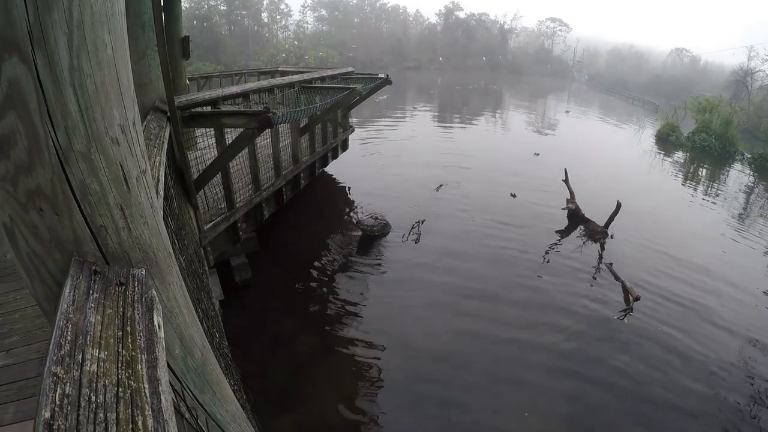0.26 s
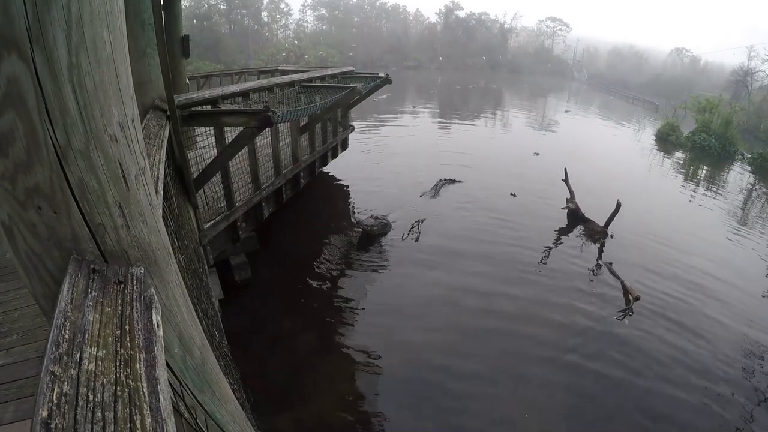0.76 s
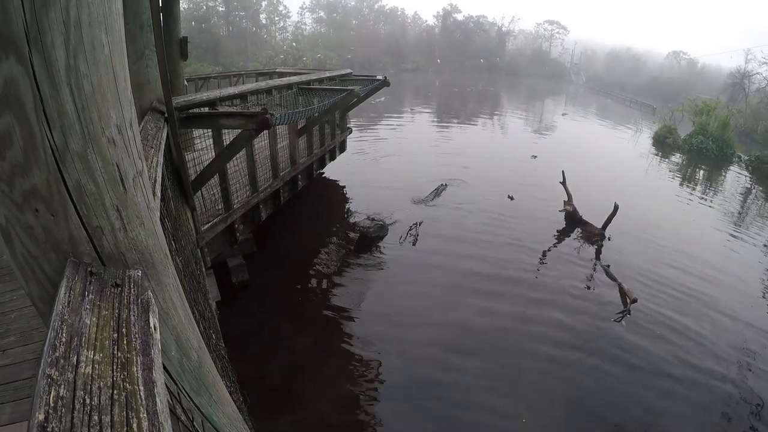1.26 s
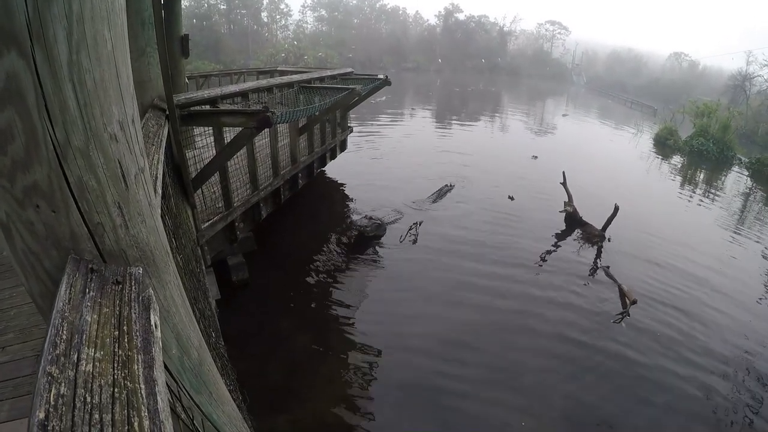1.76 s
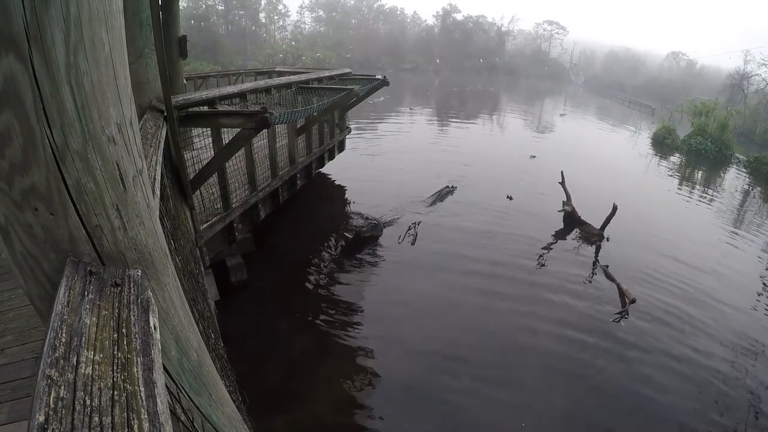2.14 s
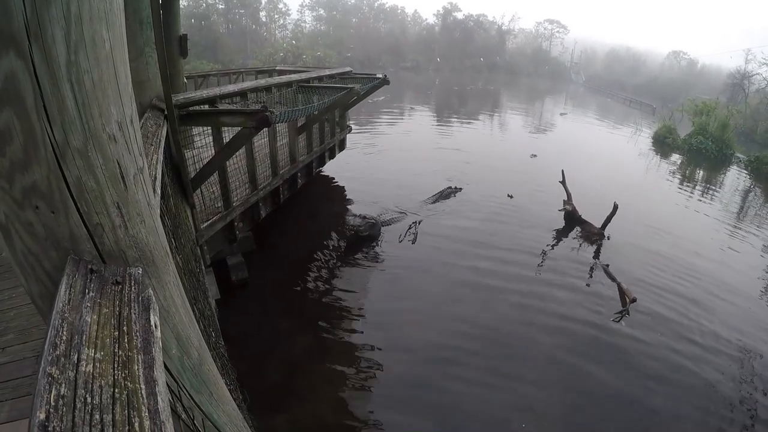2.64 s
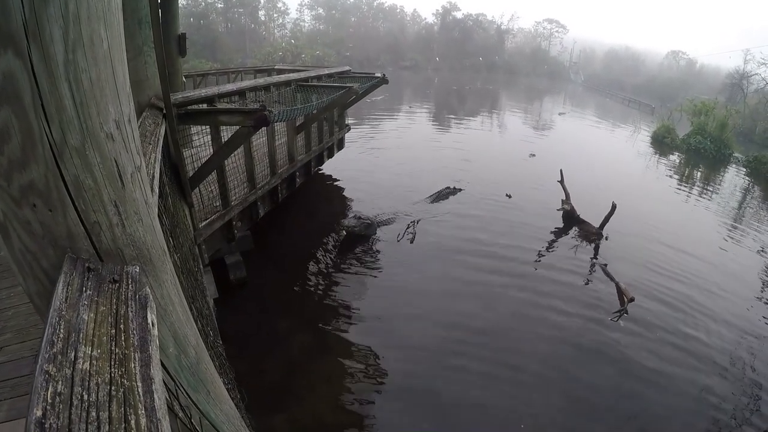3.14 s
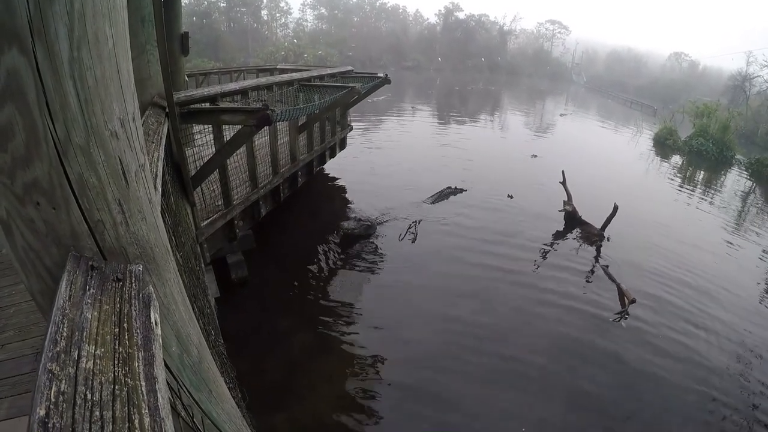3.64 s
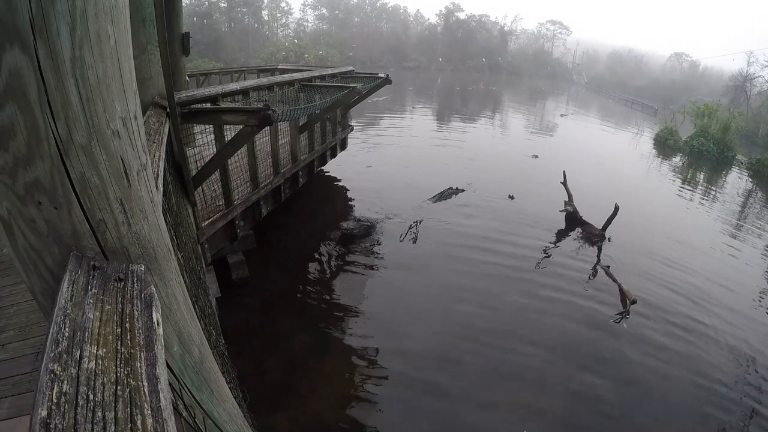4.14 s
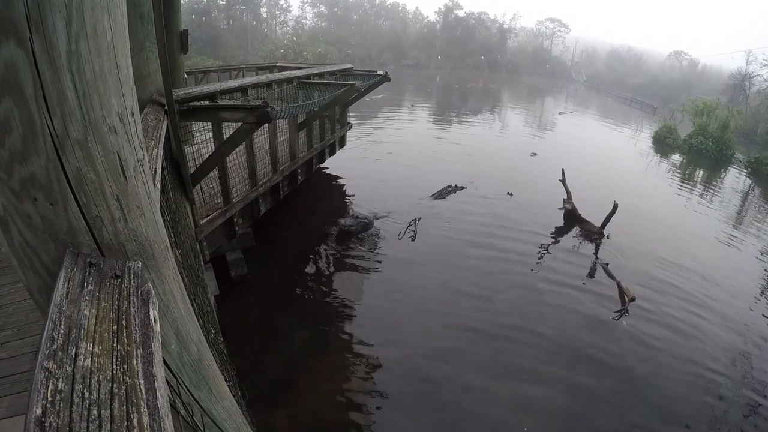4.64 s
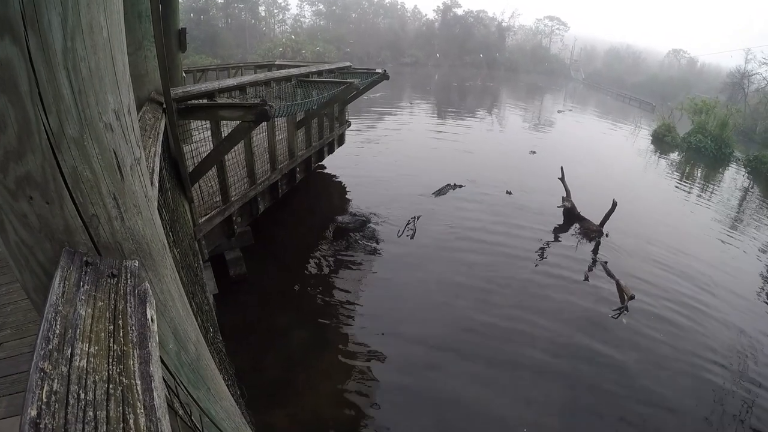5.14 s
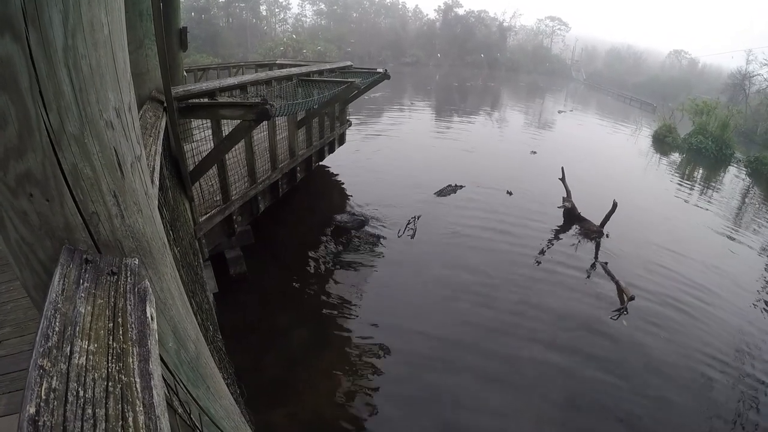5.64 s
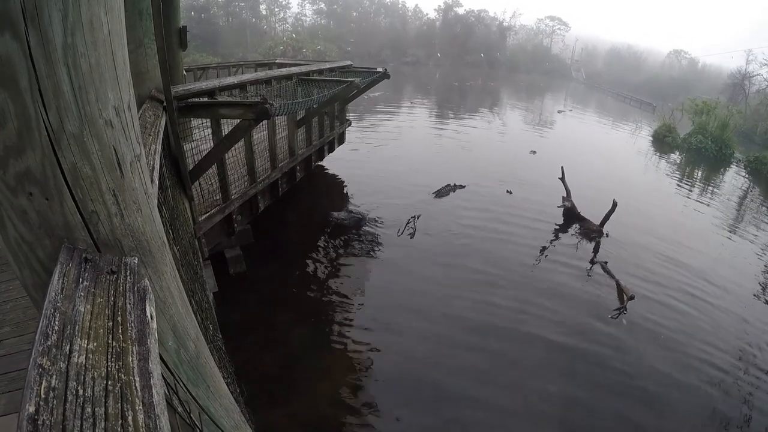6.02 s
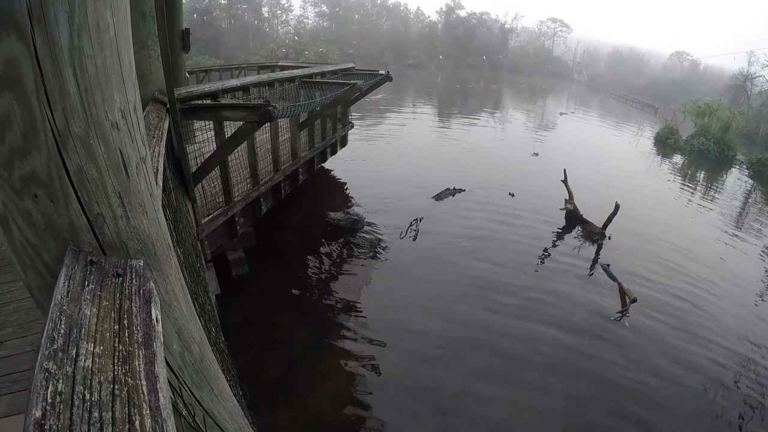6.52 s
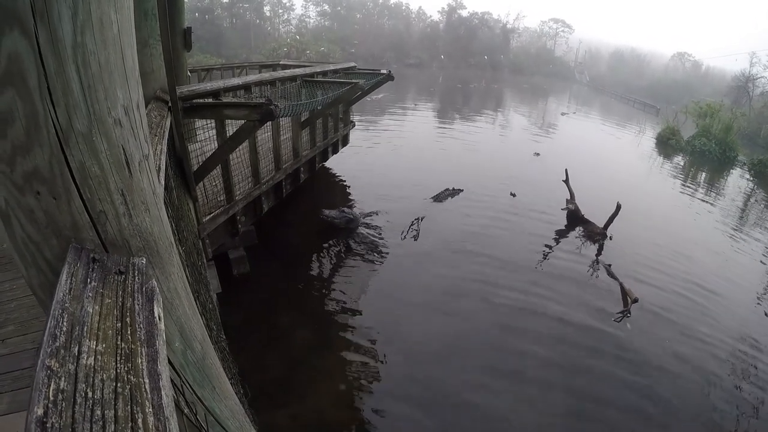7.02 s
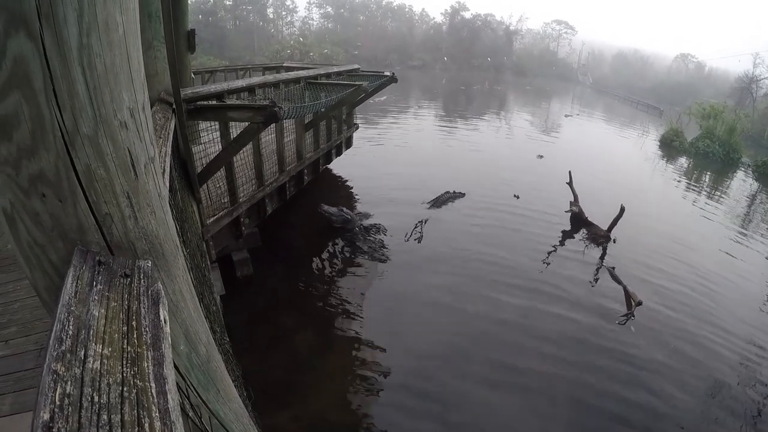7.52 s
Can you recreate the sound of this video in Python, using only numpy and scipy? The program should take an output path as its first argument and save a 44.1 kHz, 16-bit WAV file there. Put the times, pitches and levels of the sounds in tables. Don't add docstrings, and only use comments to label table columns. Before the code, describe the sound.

A deep alligator bellow is already under way at 0 seconds, throbbing in quick low pulses with a breathy snout rasp, fading by 1.8. Three short, weak, more distant bellows overlap from 1.6 to 3.4. A bird in the trees chips sharply at 1.2 and 1.7, then about five times a second from 1.9 to 3.5, each note falling and echoing softly. A lull follows, with tiny ticks and faint whistles over low far murmuring. At 4.5 a very deep rumble swells, shaking the water, and at 5.0 the nearest alligator bursts into a loud, rough, pulsing bellow until 6.5. Another swells slowly at 6.3, and a last strong one begins at 7.4, cut off at 7.8. Sparse chips continue from 5.2 to 6.6; hoarse bird rasps and whistles grow around 7 to 7.8. Soft open-air hiss and a thin, high camera whine remain throughout.

```python
import sys
import numpy as np
from scipy import signal
from scipy.fft import rfft, irfft
from scipy.io import wavfile
from scipy.ndimage import uniform_filter1d, map_coordinates

SR = 44100
rng = np.random.default_rng(int(sys.argv[2]) if len(sys.argv) > 2 else 0)


def bounce(signal):
    frames = np.transpose(np.atleast_2d(signal))
    limited = np.clip(frames, -1, 1)
    pcm = np.round(limited * 32767).astype(np.int16)
    wavfile.write(sys.argv[1], SR, pcm)


def ratio_of_db(decibels):
    return 10 ** (np.asarray(decibels, float) / 20)


N = 342657
T = np.arange(N) / SR


def rms_one(x):
    return x / np.sqrt(np.mean(x ** 2) + 1e-20)


def in_time(rows):
    s, *columns = np.transpose(rows)
    return [np.interp(T, s, c) for c in columns]


def gate(t0, t1, fade):
    return np.clip(np.minimum(T - t0, t1 - T) / fade + .5, 0, 1)


def drift(hz, count=N):
    knots = rng.standard_normal(int(count * hz * 2 / SR) + 3)
    return map_coordinates(knots, [np.arange(count) * hz * 2 / SR], order=2)


def coloured(x, spectrum):
    size = 2 ** 15
    hz, db = np.transpose(spectrum)
    bins_hz = np.arange(size // 2 + 1) * SR / size
    log_gain = np.interp(np.log(bins_hz + 1), np.log(hz), np.maximum(db, -90)) * np.log(10) / 20
    cepstrum = irfft(log_gain)
    cepstrum[1:size // 2] *= 2
    cepstrum[size // 2 + 1:] = 0
    return rms_one(signal.fftconvolve(x, irfft(np.exp(rfft(cepstrum))))[:len(x)])


def resonances(x, peaks, patchy_db):
    out = 0
    for k, (hz, width, db) in enumerate(peaks):
        r = np.exp(-np.pi * width / SR)
        gain = ratio_of_db(db) * (-1) ** k * np.sqrt((1 - r * r) * width)
        ring = signal.lfilter([gain, 0, -gain], [1, -2 * r * np.cos(2 * np.pi * hz / SR), r * r], x)
        out = out + ring * ratio_of_db(patchy_db * drift(6.03, count=len(x)))
    return rms_one(out)


def band(x, low_hz, high_hz):
    return signal.sosfilt(signal.butter(3, [low_hz, high_hz], "band", fs=SR, output="sos"), x)


def note(hz, shape, octave_db, twelfth_db):
    phase = 2 * np.pi * np.cumsum(hz) / SR
    octave = ratio_of_db(octave_db) * np.sin(2 * phase)
    twelfth = ratio_of_db(twelfth_db) * np.sin(3 * phase)
    return np.sqrt(2) * shape * (np.sin(phase) + octave + twelfth)


def add(out, s, sound):
    at = round(s * SR)
    out[at:at + len(sound)] += sound[:N - at]


def heaves():
    # (from/s, to/s, gap/s, odd strength 0-1, even strength 0-1)
    steady_runs = [
        (.49, 1.18, .068, .8, .55),
        (1.204, 1.5, .115, .7, .5),
        (6.55, 7.35, .077, .5, .75),
        (7.455, 7.74, .118, .7, .6),
    ]
    # (t/s, strength 0-1)
    near_heaves = [(5.208, 0.43), (5.274, 0.53), (5.353, 0.35), (5.433, 0.48), (5.507, 0.45), (5.582, 0.75),
                   (5.674, 0.62), (5.766, 0.55), (5.842, 0.6), (5.935, 0.34), (6.032, 0.38), (6.09, 0.42),
                   (6.129, 0.49), (6.2, 0.24), (6.289, 0.05)]
    runs = []
    for first, last, gap, *both in steady_runs:
        runs += [(s, both[k % 2]) for k, s in enumerate(np.arange(first, last, gap))]
    return sorted(runs + near_heaves)


def heaving(fall_s):
    kicks = np.zeros(N)
    for s, strength in heaves():
        kicks[round(s * SR)] = strength
    return signal.lfilter([1], [1, -np.exp(-1 / (fall_s * SR))], kicks)


def locked(phase, t):
    at = np.array([s + .004 for s, strength in heaves() if t[0] < s < t[-1]] + [t[-1]])
    cycles = np.interp(at, t, phase)
    return phase + np.interp(t, at, np.round(cycles) - cycles)


def course(call, pitch, voice, rough):
    onset_db, release_db, release_s = -9, -6.5, .091
    rasp_onset_db, rasp_swell_s = -11.5, .12
    mouth_follows, rasp_follows = .59, .97
    start, end, attack, peak_db, fade_db = call
    onset_hz, top_hz, top_after, end_hz = pitch
    turns = [start, start + attack, end - release_s, end]
    top = start + top_after
    knee = top + .4 * (end - top)
    knee_hz = top_hz + .65 * (end_hz - top_hz)
    s = np.sort(turns + [top, knee])
    swing = np.interp(s, turns, [onset_db, 0, fade_db, fade_db + release_db])
    hz = np.interp(s, [start, top, knee, end], [onset_hz, top_hz, knee_hz, end_hz])
    mouth_db = voice[0] + (mouth_follows - 1) * swing
    rasp_db = voice[1] + rasp_follows * swing + rasp_onset_db * np.exp(-(s - start) / rasp_swell_s)
    return np.transpose([s, hz, peak_db + swing, mouth_db, rasp_db, rough + 0 * s])


def snout_rasp(swell, puff, late, snout, ring_db, flutter, spray_fade_db):
    # (f/Hz, level per Hz/dB)
    droplets = [(350, -48.5), (600, -17), (900, -10.5), (1320, -9.5), (1970, -3.5), (3180, -1), (4500, -4),
                (6200, -11), (8000, -17.5), (10500, -23.5), (13500, -25.5), (15500, -29)]
    air = rng.standard_normal((2, len(swell)))
    gust = uniform_filter1d(swell, size=700, origin=300)
    rings = ratio_of_db(ring_db) * resonances(gust ** flutter * (puff + .8) * air[0], snout, patchy_db=2.2)
    hiss = coloured(gust ** .2 * (puff + 1.2) * air[1], droplets)
    return rms_one(rings + ratio_of_db(spray_fade_db * (late - .3)) * hiss)


def bellow(rows, colours, snout, ring_db, depth, steady, flutter, spray_fade_db, heave):
    begin, end = rows[0][0], rows[-1][0]
    part = slice(int(max(begin - .05, 0) * SR), int(min((end + .1) * SR, N)))
    t = T[part]
    count = len(t)
    hz, chest_db, mouth_db, rasp_db, rough = [c[part] for c in in_time(rows)]
    rough = np.clip(rough, 0, .95)

    phase = np.cumsum(hz * (1 + .06 * rough * drift(25, count=count))) / SR
    if depth > .65:
        phase = locked(phase, t)
    strength = ratio_of_db(2.0 * rough * rng.standard_normal(400)[phase.astype(int)])
    swell = 1 + depth * (2.3 * heave[part] - .6)
    swell[:np.argmax(np.diff(heave[part]) > 0)] = steady

    pulses = np.diff(np.floor(phase), prepend=np.floor(phase[0])) * strength * np.sqrt(SR / hz)
    puff = np.exp(-2.5 * (phase % 1)) * strength
    breath = 1.4 * rough * (puff + .3) * rng.standard_normal(count)
    source = swell * np.sqrt(1 - rough ** 2) * pulses
    source += uniform_filter1d(swell, size=500, origin=200) * breath

    late = np.clip(np.linspace(-.4, 1.5, count), 0, 1)
    voice = 0
    for k, colour in enumerate(colours):
        share = np.clip(1 - abs(late * (len(colours) - 1) - k), 0, 1)
        voice = voice - share * coloured(source, colour)
    chest = rms_one(band(voice, 22.7, 253))
    evened = uniform_filter1d(swell, size=500, origin=240) ** .85
    mouth = rms_one(band(voice, 266.5, 634) / evened)
    sway_s = .003 * rough ** 1.5 * drift(7, count=count)
    mouth = np.interp(t + sway_s, t, mouth)
    mouth *= ratio_of_db(mouth_db + 6 * rough * drift(11.12, count=count))
    rasp = snout_rasp(swell, puff, late, snout, ring_db, flutter, spray_fade_db)

    out = np.zeros(N)
    out[part] = ratio_of_db(chest_db + 0.5) * (chest + mouth) + ratio_of_db(rasp_db + 4.0) * rasp
    return out * gate(begin, end, .025)


def throats():
    # (f/Hz, level per Hz/dB); early to late where the jaw moves
    first_early = [(49, 9.5), (81, -24), (118, 0.5), (178, -12), (273, -24), (358, -29), (401, -1),
                   (641, -61)]
    first_late = [(132, -5.5), (183, -13), (217, -22), (302, -28), (333, -42.5), (401, -10), (437, -61),
                  (750, -25)]
    second = [(53, -8), (81, -21), (123, 3), (251, -16), (315, -4), (363, -20), (431, -15), (750, -30.5)]
    third = [(59, 11), (146, -8), (181, 16), (233, -6.5), (306, 2.5), (333, -15), (413, -13.5),
             (750, -32.5)]
    fourth = [(86, 3.5), (140, -36.5), (176, 5), (230, -28), (302, 0.5), (363, -15.5), (469, -3.5),
              (750, -44)]
    near_early = [(43, 2), (76, -9.5), (113, 1.5), (159, -9.5), (194, -21.5), (269, -26), (365, -2.5),
                  (450, -26)]
    near_middle = [(48, 1), (74, -6.5), (118, -2.5), (155, -1.5), (200, -27), (273, -24), (375, -8),
                   (450, -30)]
    near_late = [(43, 2), (90, -13.5), (150, 5), (168, -9.5), (214, -22.5), (290, -29), (390, -11.5),
                 (449, -44.5)]
    sixth = [(48, -4), (150, -3.5), (269, -13.5), (306, -6.5), (343, -36), (395, -4), (476, -11.5),
             (590, -47)]
    seventh = [(44, -4.5), (76, 6.5), (113, 2), (155, -4.5), (214, -5), (273, -20), (407, -8), (750, -70)]
    below = [(15, -48), (25, -17)]
    above = [(980, -81.5), (1650, -120)]
    animals = [[first_early, first_late], [second], [third], [fourth],
               [near_early, near_middle, near_late], [sixth], [seventh]]
    return [[below + colour + above for colour in animal] for animal in animals]


def bellows():
    # (start/s, end/s, attack/s, peak chest level/dB, fade/dB)
    calls = [
        (-.2, 1.82, 0.14, -17.5, -21),
        (1.6, 2.26, 0.059, -31.5, -1),
        (2.15, 2.82, 0.05, -33, -1),
        (2.68, 3.39, 0.12, -32, -5.5),
        (5.035, 6.5, 0.05, -9.5, -11.5),
        (6.3, 7.46, 0.24, -23, -7),
        (7.429, 7.8, 0.34, -14, 1),
    ]
    # (onset f/Hz,
    # turning f/Hz, turn after/s, end f/Hz)
    pitches = [(57.54, 58.6, .65, 36), (56.86, 68, 0.18, 56), (26.34, 25.6, 0.32, 21),
               (45.96, 44, 0.3, 41.5), (65.6, 53, .09, 48), (52.37, 53, .19, 37), (43.66, 55.6, 0.3, 83)]
    # (mouth re chest/dB, snout rasp/dB, snout ring re broad air/dB)
    voices = [(-24, -45.5, 7), (-7.5, -54, -6.5), (-5, -57.5, -11), (-10, -59, -17), (-18, -41, 3),
              (-14.5, -50.5, 0.5), (-21, -41.5, -6.5)]
    roughness = [.36, .08, .04, .04, .43, .38, .4]
    depths = [.64, .2, .2, .2, 1.1, .45, .3]
    steady = [0.88, .8, .8, .8, 0.61, 1.3, 0.39]
    flutters = [1.7, .7, .7, .7, .5, 1.0, .8]
    spray_fades = [8, 2, -4, 1, -9, -0.5, -2.5]
    # (f/Hz, width/Hz, level/dB)
    left = [(1075, 45, 2.5), (1614, 31, -6), (1968, 22, -2.5), (2306, 57, 3), (2667, 41, 2), (3008, 37, 2),
            (3870, 400, -50), (4900, 46, -15.5)]
    near = [(774, 30, -2), (918, 30, -0.5), (1074, 34, -1), (1322, 44, -1.5), (1720, 42, -3.5),
            (2034, 31, 3), (2437, 58, -1.5), (2745, 45, 1.5), (3186, 52, 0), (3880, 180, -14),
            (5150, 390, -14)]
    last = [(1130, 28, 5), (1780, 150, -7), (2220, 130, -1), (2520, 38, -16)]
    heave = heaving(fall_s=.026)
    courses = map(course, calls, pitches, voices, roughness)
    snouts = [left, left, left, left, near, left, last]
    rings_db = np.transpose(voices)[-1]
    settings = zip(courses, throats(), snouts, rings_db, depths, steady, flutters, spray_fades)
    return sum(bellow(*setting, heave) for setting in settings)


def murmur():
    # (t/s, level/dB)
    chorus = [(0, -24), (1, -27), (2, -26), (3, -30.5), (3.45, -32), (3.75, -35.5), (4.35, -35), (5, -36),
              (6, -26.5), (6.9, -23), (7.77, -23)]
    # (f/Hz, level per Hz/dB)
    far_colour = [(13, -45), (22, -8.5), (53, -3.5), (71, -5.5), (129, -10), (176, -12.5), (193, -16),
                  (237, -19.5), (408, -25), (441, -21), (462, -24.5), (900, -60.5), (1170, -80),
                  (1980, -120)]
    far_db, = in_time(chorus)
    clicks = 0
    for hz in (41, 49, 57):
        cycles = np.cumsum(hz * (1 + .08 * drift(1.5))) / SR
        clicks = clicks + np.diff(np.floor(cycles), prepend=0) * ratio_of_db(2.5 * drift(2.5))
    return ratio_of_db(far_db) * coloured(rms_one(clicks) + 1.29 * rng.standard_normal(N), far_colour)


def pond_air():
    # (f/Hz, level per Hz/dB)
    air_colour = [(350, -30), (600, -13), (950, -9.5), (1470, -15), (1840, -13), (2500, -15.5), (3200, -17),
                  (4500, -21), (6200, -26.5), (8000, -32.5), (10500, -31.5), (13500, -36.5), (15500, -40.5)]
    return ratio_of_db(-58) * coloured(rng.standard_normal(N) * ratio_of_db(1.0 * drift(6.6)), air_colour)


def whine():
    # (f/Hz, level/dB)
    tones = [(10048, -78.5), (10068, -86), (15081, -88)]
    return sum(np.sqrt(2) * ratio_of_db(db) * np.sin(2 * np.pi * hz * T + 1.5 * drift(4)) for hz, db in tones)


def whistles():
    # (start/s, length/s, level/dB, from f/Hz, to f/Hz)
    calls = [(0.249, 0.17, -66, 5830, 6530), (1.4, .3, -77, 6300, 7340), (3.762, 0.09, -69, 3000, 3450),
             (4.28, 0.038, -63, 2880, 3300), (4.294, 0.041, -70, 6500, 6470), (4.32, .04, -70, 3300, 3400),
             (4.86, 0.13, -75, 5970, 5970), (4.845, .17, -66, 3040, 2970), (4.996, 0.062, -66, 3810, 3800),
             (6.51, 0.087, -65, 4428, 4370), (6.665, .045, -60, 6440, 6470),
             (6.728, 0.097, -63, 6500, 7100), (7.218, .024, -53, 4730, 5000),
             (7.445, 0.058, -50, 2930, 3190), (7.568, .02, -45, 3100, 3100), (7.61, .13, -48, 3120, 3080),
             (7.48, .03, -58, 5100, 5100), (7.57, 0.21, -56, 5240, 5190)]
    out = np.zeros(N)
    for s, length, db, from_hz, to_hz in calls:
        u = np.linspace(0, 1, round(length * SR))
        hz = (from_hz + (to_hz - from_hz) * u ** 1.6) * (1 + 0.02 * drift(90, count=len(u)))
        unsteady = ratio_of_db(3.5 * drift(60, count=len(u)))
        add(out, s, ratio_of_db(db) * note(hz, unsteady * np.sin(np.pi * u) ** .5, -23, -38))
    return out


def chip(out, call, kind, form):
    s, db, top_hz, swell_db = call
    length, bend, lean, flick_db, twelfth_db, arch_hz = kind
    opens, dip_db, fade_db = form
    end_hz = 2750
    u = np.linspace(0, 1, round(length * SR))
    t = u * length
    hz = top_hz - (top_hz - end_hz) * (lean * u + (1 - lean) * u ** bend)
    hz -= 2000 * np.exp(-t / .0012) + arch_hz * np.exp(-t / .007)
    hz *= 1 + .015 * drift(300, count=len(u))

    dip = dip_db * np.exp(-((u - .8) / .12) ** 2)
    flutter = 1 + .6 * u * np.sin(2 * np.pi * 154 * t)
    flutter *= ratio_of_db(swell_db * (u - .5) + dip + 2.5 * drift(154, count=len(u)))
    opening = np.clip(.35 + (t - opens) / .003, .35, 1)
    shape = flutter * np.sin(np.pi * u) ** .3 * opening
    add(out, s - .006, ratio_of_db(db) * note(hz, shape, -19 + fade_db * u ** 2, twelfth_db))

    flick = np.linspace(0, 1, round(0.0066 * SR))
    bump = np.sin(np.pi * flick)
    add(out, s + 0.00104, ratio_of_db(db + flick_db) * note(2600 + 1100 * flick, bump, -41.0, -66))
    add(out, s - .007, ratio_of_db(db + flick_db - 3) * note(3000 + 1100 * flick, bump, -30, -67))
    puff = band(rng.standard_normal(700), 4500, 6800) * np.hanning(700)
    add(out, s + length - .02, ratio_of_db(db - 11 + swell_db / 2) * puff)


def chips():
    # (t/s, level/dB, top f/Hz, swell from top to end/dB)
    held = [
        (1.157, -34.5, 5140, -0.5),
        (1.66, -33, 5120, 8.5),
    ]
    arched = [
        (6.626, -35, 5350, 9.1),
    ]
    sung = [(1.919, -37, 4930, 3), (2.124, -38.5, 4830, 4.6), (2.332, -37, 4720, 11.3),
            (2.525, -37, 4670, 9.9), (2.72, -37, 4635, 5.4), (2.914, -38, 4580, 8.5),
            (3.096, -38, 4620, 11.6), (3.284, -36, 4626, 8.1), (3.484, -36.5, 4600, 8),
            (5.228, -44, 4250, 4)]
    short = [
        (4.208, -63, 4420, 15),
        (5.949, -47, 3800, 28),
        (6.189, -42, 3800, 16),
    ]
    # (length/s, bend of fall, steady share of fall, low flick/dB, twelfth/dB, arch/Hz)
    kinds = [
        (.054, 5.0, .3, -18, -36, 250),
        (.053, 6.0, .1, -20, -29, 400),
        (.056, 3.0, .42, -3.5, -36, 0),
        (.028, 3.0, .4, -8, -41, 0),
    ]
    # (quiet opening/s, dip late in the fall/dB, octave fade/dB)
    forms = [
        (.010, -9, -20),
        (.003, -4, -8),
        (.0045, -2, -14),
        (.0045, 0, -8),
    ]
    out = np.zeros(N)
    for calls, kind, form in zip([held, arched, sung, short], kinds, forms):
        for call in calls:
            chip(out, call, kind, form)
    return out


def ticks():
    # (t/s, level/dB, f/Hz)
    knocks = [(4.218, -58, 2850), (4.222, -64, 2000), (4.272, -66, 3300), (4.37, -64, 3400),
              (4.615, -60, 3600), (6.613, -56, 3500), (7.574, -40, 3080), (7.59, -50, 2200),
              (7.61, -52, 2400), (7.715, -47, 5200)]
    out = np.zeros(N)
    for s, db, hz in knocks:
        wavering = hz * (1 + .05 * drift(300, count=260))
        add(out, s - .003, ratio_of_db(db) * note(wavering, np.hanning(260), -30, -40))
    return out


def rasps():
    # (centre/s, length/s, level/dB)
    calls = [(4.295, 0.13, -61), (4.63, 0.015, -57.5), (6.915, 0.051, -52), (7.242, 0.03, -50.5),
             (7.086, 0.095, -43.5), (7.46, 0.13, -41.5), (7.77, 0.045, -39.5)]
    # (f/Hz, level per Hz/dB)
    hoarse_colour = [(1180, -41), (2000, -16), (2500, -13), (3060, 3.5), (3500, -6), (3900, 1),
                     (4600, -3.5), (6000, -13), (7000, -18.5), (8200, -20), (9800, -29), (12200, -24.5),
                     (14000, -38), (15500, -50)]
    swells = 0
    for s, length, db in calls:
        width = np.where(T < s, .75, .15) * length
        swells = swells + ratio_of_db(db) * np.exp(-((T - s) / width) ** 2)
    cycles = np.cumsum(140 * (1 + .1 * drift(20))) / SR
    pulsing = ratio_of_db(1.8 * drift(120) + 5 * np.sin(2 * np.pi * cycles))
    return swells * coloured(rng.standard_normal(N) * pulsing, hoarse_colour)


def woods(x, wet_db, t60):
    # (delay/s, level/dB)
    echoes = [(.005, -8), (.0075, -11), (.0278, -1.5), (.041, -11), (.055, -15), (.078, -17)]
    t = T[:SR]
    leaves = rng.standard_normal(SR) * ratio_of_db(-60 * t / t60) * np.clip(t / 0.006, 0, 1)
    tail = ratio_of_db(wet_db) * rms_one(leaves) / np.sqrt(SR)
    banks = np.zeros(SR)
    for delay, db in echoes:
        banks[round(delay * SR)] += ratio_of_db(db)
    banks = signal.lfilter(*signal.butter(2, 2900, fs=SR), banks)
    return x + signal.fftconvolve(x, signal.lfilter([.4], [1, -.6], tail) + banks)[:N]


def rumble():
    # (t/s, f/Hz, level/dB)
    shaking = [(4.49, 23, -30), (4.56, 22, -20.5), (4.605, 24.5, -12), (4.655, 14, -11.5),
               (4.70, 23.7, -11.5), (4.85, 20, -12.5), (4.97, 23, -13.5), (5.041, 29, -12.5),
               (5.09, 40, -13)]
    # (multiple of the low tone, level/dB)
    orders = [(1, -5), (2, -14), (3, -21), (4, -34), (5, -43), (6, -41), (7, -44)]
    hz, db = in_time(shaking)
    cycles = np.cumsum(hz) / SR
    crest_s = 4.775
    phase = 2 * np.pi * (cycles - np.interp(crest_s, T, cycles)) + 2.1
    wave = sum(ratio_of_db(level_db) * np.sin(k * phase - 2.4 * (k - 1)) for k, level_db in orders)
    return np.sqrt(2) * ratio_of_db(db) * wave * gate(shaking[0][0], shaking[-1][0], 0.03)


def scene():
    background = murmur() + pond_air() + whine()
    birds = whistles() + chips() + ticks() + rasps()
    echoing_birds = woods(birds, wet_db=-0.5, t60=0.43)
    return (bellows() + rumble() + echoing_birds + background)[None]


def top_cut(x):
    return signal.sosfilt(signal.butter(12, 15300, fs=SR, output="sos"), x)


def record(dry):
    mix = 1.1 * np.tanh(dry / 1.1)
    return top_cut(mix)


dry = scene()
out = record(dry)
bounce(out)
```